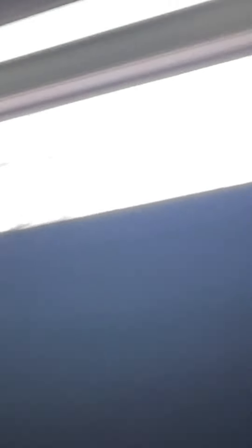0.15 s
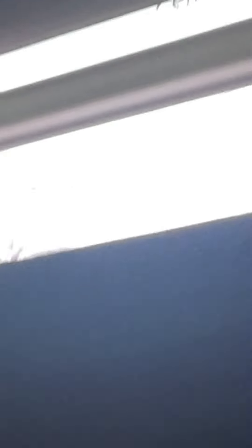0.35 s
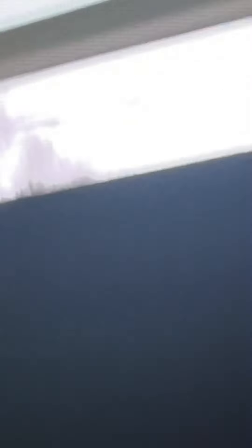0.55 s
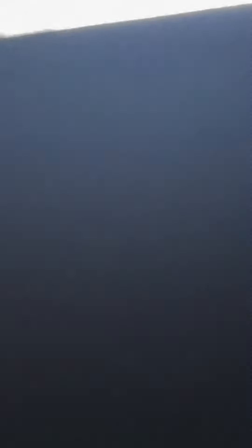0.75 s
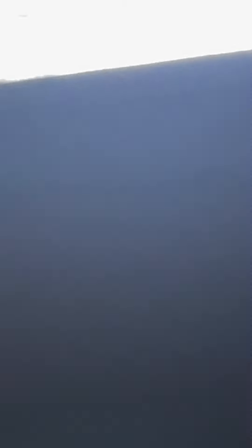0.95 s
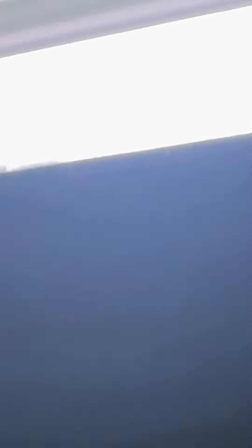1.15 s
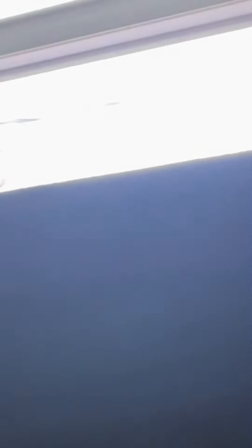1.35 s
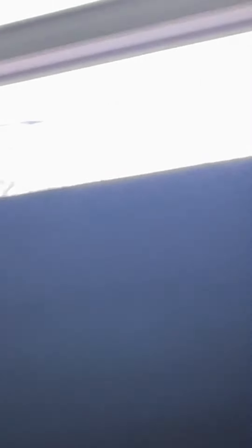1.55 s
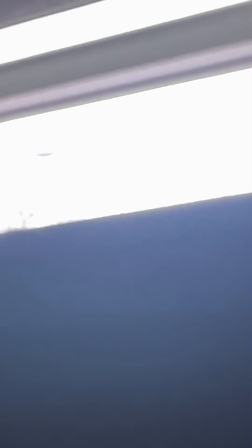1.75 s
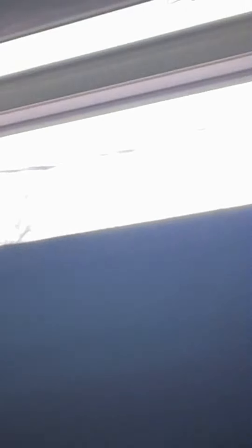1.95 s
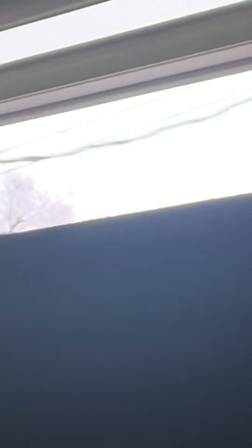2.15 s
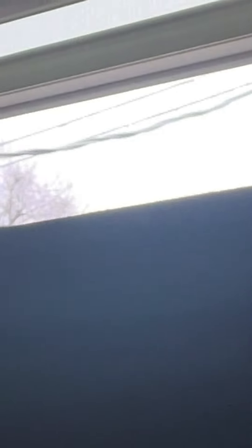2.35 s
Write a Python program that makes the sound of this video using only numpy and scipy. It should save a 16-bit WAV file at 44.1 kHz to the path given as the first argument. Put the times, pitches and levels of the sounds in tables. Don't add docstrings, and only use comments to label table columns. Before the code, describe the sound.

A phone's plastic case scuffs and creaks, then snaps loudly right at the start; a weaker snap, a cluster of ticks and a later knock follow, with low handling rumble, very close in a quiet room.

```python
import sys
import numpy as np
from scipy import signal
from scipy.fft import rfft, irfft
from scipy.io import wavfile
from scipy.ndimage import uniform_filter1d

SR = 44100
rng = np.random.default_rng(int(sys.argv[2]) if len(sys.argv) > 2 else 0)


def level_to_linear(level):
    exponent = np.asarray(level, float) / 20
    return 10 ** exponent


def store_wav(level_fs):
    pcm = np.round(np.clip(np.atleast_2d(level_fs), -1, 1) * 32767)
    wavfile.write(sys.argv[1], SR, pcm.T.astype(np.int16))


N = 105840


def evened(x):
    return x / np.sqrt(np.mean(x ** 2) + 1e-20)


def add(mix, start_s, sound):
    part = mix[round(start_s * SR):][:len(sound)]
    part += sound[:len(part)]


def coloured(x, points):
    hz, db = np.transpose(points)
    bins_hz = np.fft.rfftfreq(N, 1 / SR)
    gain = level_to_linear(np.interp(np.log(bins_hz + 1), np.log(hz + 1), db, -80, -80))
    return evened(irfft(rfft(x) * gain, N))


def resonate(x, hz, width):
    r = np.exp(-np.pi * width / SR)
    return evened(signal.lfilter([1, 0, -r], [1, -2 * r * np.cos(2 * np.pi * hz / SR), r * r], x))


def mode(x, hz, width):
    return resonate(resonate(x, hz, width), hz, width)


def wander(width_s):
    size = int(width_s * SR)
    return evened(uniform_filter1d(uniform_filter1d(rng.standard_normal(N), size), size))


def swell(peak_s, rise_s, fall_s):
    t = np.arange(N) / SR - peak_s
    return np.exp(-(t / np.where(t < 0, rise_s, fall_s)) ** 2)


def ring(hz, t60):
    t = np.arange(800) / SR
    return np.minimum(t * hz, 1) * level_to_linear(-60 * t / t60) * np.sin(2 * np.pi * hz * t)


def room():
    # pitch_hz, level_db
    hiss_spectrum = [(240, -29), (400, -9), (1080, -11.5), (1640, -1), (2580, -20), (3410, -18.5),
                     (3680, -24), (14300, -39), (14900, -53)]
    # pitch_hz, width_hz, level_db
    room_modes = [(960.4, 72, -81), (1550, 900, -77), (1678, 336, -68.5), (2086, 400, -75),
                  (3284, 37, -85.5), (3480, 29, -87)]
    hums = np.zeros(N)
    for hz, width, db in room_modes:
        hums += level_to_linear(db + 0.42 * wander(0.037)) * mode(rng.standard_normal(N), hz, width)
    hiss_db = -68 + 0.48 * wander(0.0076)
    return level_to_linear(hiss_db) * coloured(rng.standard_normal(N), hiss_spectrum) + hums


def grip():
    # time_s, level_db
    grip_levels = [(0.0, -71.5), (0.14, -64.5), (0.37, -61), (0.49, -61.5), (0.61, -66), (0.77, -62),
                   (1.0, -68), (1.26, -59.5), (1.4, -58.5), (1.56, -60.5), (1.84, -65), (1.97, -69),
                   (2.02, -60), (2.2, -57), (2.3, -59.5), (2.4, -60.5)]
    # pitch_hz, level_db
    rumble_spectrum = [(25, -57), (45, -8), (65, 0.5), (108, -6.5), (160, -2), (250, -9), (360, -19),
                       (700, -32)]
    lumpy_db = 2.5
    s, db = np.transpose(grip_levels)
    level_db = np.interp(np.arange(N) / SR, s, db) + lumpy_db * wander(0.09)
    return level_to_linear(level_db) * coloured(rng.standard_normal(N), rumble_spectrum)


def scuffs():
    # peak_s, rise_s, fall_s, body_db, grind_db
    strokes = [(0.045, 0.02, 0.022, -62, -75), (.112, 0.0066, 0.011, -57, -72),
               (0.135, 0.019, 0.027, -55.5, -62.5), (0.206, 0.027, 0.0024, -60, -59),
               (0.249, 0.042, 0.016, -68.5, -62), (0.352, 0.0026, 0.013, -54.5, -62.5),
               (.482, 0.001, 0.0056, -48.5, -69), (0.507, 0.0035, 0.0071, -64, -57),
               (0.493, 0.027, 0.031, -45, -55.5), (0.568, 0.058, 0.081, -58.5, -63),
               (1.125, 0.022, 0.0038, -59, -55.5), (1.135, 0.0039, 0.006, -49, -43),
               (1.163, 0.0099, 0.0075, -54.5, -52.5), (1.197, 0.029, 0.035, -60.5, -65),
               (1.48, 0.0088, 0.065, -69, -60.5), (1.738, 0.089, 0.037, -67.5, -64),
               (1.61, 0.031, 0.021, -56, -64.5), (1.655, 0.016, 0.017, -54.5, -67),
               (2.13, 0.034, 0.085, -69, -73.5), (2.36, 0.13, 0.077, -77, -70)]
    # pitch_hz, width_hz, level_db
    body_modes = [(821, 243, 5.5), (933, 250, 4), (1550, 357, 9), (2430, 290, -1)]
    grit_per_s, grit_db, smooth = 3700, 4, 1
    grind_hz, grind_width = 243, 317
    size = level_to_linear(grit_db * np.minimum(rng.exponential(1, N), 5))
    struck = rng.random(N) < grit_per_s / SR
    grit = size * struck * rng.choice([-1, 1], N)
    drive = evened(grit) + smooth * rng.standard_normal(N)
    body = evened(sum(level_to_linear(db) * mode(drive, hz, width) for hz, width, db in body_modes))
    grind = mode(drive, grind_hz, grind_width)
    out = np.zeros(N)
    for peak, rise, fall, body_db, grind_db in strokes:
        out += swell(peak, rise, fall) * (level_to_linear(body_db) * body + level_to_linear(grind_db) * grind)
    return out


def sways():
    # centre_s, half_length_s, level_db, pitch_hz
    swings = [(0.068, 0.0081, -64, 62.5), (0.487, 0.024, -61.5, 72), (0.581, 0.031, -56.5, 61),
              (0.724, 0.04, -56.5, 60.4), (0.85, 0.037, -62, 64), (1.079, 0.031, -55, 72.6),
              (1.216, 0.018, -63, 58.5), (1.651, 0.037, -57, 65), (1.742, 0.039, -56.5, 65.6),
              (1.877, 0.022, -56.5, 68.2), (2.006, 0.025, -60.5, 73.5), (2.089, 0.046, -51, 61.5),
              (2.164, 0.026, -49, 65), (2.285, .016, -60, 74), (2.296, 0.01, -51, 172),
              (2.37, 0.015, -54.5, 181), (1.547, 0.023, -54.5, 161), (2.36, 0.035, -58.5, 70.5)]
    t = np.arange(N) / SR
    out = np.zeros(N)
    for s, half, db, hz in swings:
        out += level_to_linear(db) * swell(s, half, half) * np.sin(2 * np.pi * hz * (t - s))
    return out


def ticks():
    # start_s, peak_db, pitch_hz
    releases = [(.1168, -49, 3420), (.158, -44, 4000), (0.475, -30, 1410), (.451, -46, 1900),
                (0.4805, -28, 1500), (0.4886, -36, 1310), (0.5045, -28, 1170), (0.516, -29, 1490),
                (0.227, -50, 9000), (0.464, -40, 1550), (0.5684, -34, 1120), (.792, -59, 4940),
                (1.272, -54, 9400), (1.4607, -47, 2550), (1.471, -42, 806), (1.1235, -33, 880),
                (1.1262, -30, 1550), (1.128, -33.5, 686), (1.1325, -33, 1520), (1.784, -47, 3040),
                (2.126, -46, 2530)]
    tick_db, tick_t60, edge_db = -1.5, 0.0025, -5
    out, t = np.zeros(N), np.arange(800) / SR
    edges = rng.standard_normal((len(releases), 800))
    for (s, db, hz), edge in zip(releases, edges):
        fade = level_to_linear(edge_db + 0.42 * (db + 29.5) - 60 * t / tick_t60)
        bright = fade * edge * min(hz / 3500, 1) ** 4
        add(out, s, level_to_linear(db + tick_db) * (ring(hz, tick_t60 * 4000 / hz) + bright))
    return out


def creak():
    # start_s, peak_db
    slips = [(.1703, -43), (.174, -56), (.1759, -51), (.178, -50), (.1802, -54), (.1833, -43), (.1859, -48),
             (.1874, -53), (.1895, -45), (.1918, -53), (.1938, -48), (.197, -48), (.2, -39), (.2031, -39),
             (.2046, -41), (.2055, -38), (.2067, -40), (.2105, -50)]
    slip_hz, slip_t60, edge_db = 4200, .0025, -7
    out, t = np.zeros(N), np.arange(800) / SR
    edges = rng.standard_normal((len(slips), 800))
    for (s, db), edge in zip(slips, edges):
        hz = slip_hz * (1 + 0.14 * edge[-1])
        click = level_to_linear(edge_db - 60 * t / slip_t60) * edge
        add(out, s, level_to_linear(db) * (ring(hz, slip_t60) + click))
    return out


def fizzes():
    # peak_s, rise_s, fall_s, rustle_db, top_db
    slides = [(0.206, 0.006, 0.0011, -48, -52), (.19, 0.019, 0.0085, -63.5, -81),
              (0.247, 0.013, 0.053, -74, -77.5), (0.337, 0.019, 0.012, -88, -78),
              (0.359, 0.019, 0.048, -71.5, -96), (0.494, 0.019, .03, -67, -69.5),
              (.58, 0.078, 0.047, -81.5, -84), (0.991, 0.036, 0.058, -74.5, -75),
              (1.133, 0.0087, 0.0066, -68.5, -71), (1.15, 0.005, 0.005, -64.5, -66),
              (1.167, 0.0026, 0.0067, -71.5, -69), (1.189, 0.061, 0.058, -74.5, -80.5),
              (1.44, 0.11, 0.047, -78.5, -107), (1.609, 0.014, 0.016, -67, -93),
              (1.645, .02, 0.019, -76.5, -94), (1.64, 0.13, 0.095, -70.5, -95),
              (2.17, 0.079, 0.18, -81.5, -96)]
    # pitch_hz, level_db
    rustle_spectrum = [(2200, -39), (3200, -4.5), (5200, -1.5), (6600, -10.5), (7800, -18), (9200, -13),
                       (11500, -32)]
    top_spectrum = [(5500, -64), (7500, 0.5), (9400, 7), (12000, 12), (14200, 7.5), (15800, -6)]
    drive = rng.standard_normal(N) * level_to_linear(2.5 * wander(0.0014))
    rustle, top = coloured(drive, rustle_spectrum), coloured(drive, top_spectrum)
    out = np.zeros(N)
    for peak, rise, fall, rustle_db, top_db in slides:
        out += swell(peak, rise, fall) * (level_to_linear(rustle_db) * rustle + level_to_linear(top_db) * top)
    return out


def bending_wave():
    start_s, level_db, fall_power = .2071, -24, .85
    turns, peak_s, rise_s = 1.44, .0024, .0017
    t = np.arange(1, 2600) / SR
    u = t / peak_s
    rise = 1 - np.exp(-(t / rise_s) ** 6)
    fall = u ** -fall_power * np.exp(-(t / .026) ** 2)
    out = np.zeros(N)
    add(out, start_s, level_to_linear(level_db) * rise * fall * np.cos(2 * np.pi * turns * np.log(u)))
    return out


def snaps():
    # start_s, crack_db, crack_hz, ring_db, ring_hz
    hard_snaps = [
        (.20833, -17.5, 5200, -19, 840),
        (.35105, -34.5, 3900, -28, 1600),
    ]
    # pitch_ratio, level_db
    crack_partials = [(.6, -8), (1.7, -11), (2.65, -16)]
    crack_cycles, crack_lead = .95, .3
    bright, hard_db = .7, -17.5
    lag_turns, ring_t60 = .22, .009
    overtone, overtone_db = 1.9, -6
    out, t = np.zeros(N), np.arange(1, 2600) / SR
    for s, crack_db, hz, ring_db, ring_hz in hard_snaps:
        softness_db = crack_db - hard_db
        u = (t - t[99]) * hz
        crack = np.cos(2 * np.pi * u)
        for ratio, db in crack_partials:
            crack += level_to_linear(db + bright * softness_db) * np.cos(2 * np.pi * ratio * u)
        burst = np.exp(-abs((u + crack_lead * level_to_linear(softness_db)) / crack_cycles) ** 1.7)
        add(out, s - t[99], level_to_linear(crack_db) * burst * crack)
        turn = 2 * np.pi * ring_hz * t
        decay = level_to_linear(ring_db - 60 * t * (ring_hz / 1000) ** 2 / ring_t60)
        decay *= np.minimum(2 * t * ring_hz, 1)
        upper = level_to_linear(overtone_db + bright * softness_db) * np.cos(overtone * (turn - 3 * np.pi / 2))
        add(out, s + lag_turns / ring_hz, -decay * (np.sin(turn) - upper))
    return out


def rebound():
    out = np.zeros(N)
    add(out, .2095, level_to_linear(-11.5) * ring(1140, .0029))
    return out


def bumps():
    # start_s, level_db, pitch_hz, hold_s, fall_s
    shakes = [(1.1284, -35.5, 138, 0.04, 0.002), (1.1768, -43, 100, 0.018, 0.012),
              (1.477, -47, 105, .016, .004), (1.506, -46.5, 80, .01, .008), (2.206, -48, 110, .011, .002),
              (.67, -49.5, 160, 0.0073, 0.0073), (1.595, -46, 139, 0.009, 0.0034)]
    sag_s = .044
    out, t = np.zeros(N), np.arange(6000) / SR
    for s, db, hz, hold, fall in shakes:
        shape = np.minimum(t / 0.0041, 1) * np.exp(-np.maximum(t - hold, 0) / fall)
        turn = 2 * np.pi * hz * sag_s * np.log(1 + t / sag_s)
        add(out, s, -level_to_linear(db) * shape * np.sin(turn))
    return out


def rub():
    # peak_s, rise_s, fall_s, level_db
    strokes = [
        (1.6, 0.01, .03, -68),
        (1.665, 0.033, 0.036, -60.5),
        (1.72, 0.055, 0.044, -65),
    ]
    hum = mode(rng.standard_normal(N), 890, 570)
    return hum * sum(level_to_linear(db) * swell(peak, rise, fall) for peak, rise, fall, db in strokes)


def scene():
    background = room() + grip()
    friction = scuffs() + fizzes() + rub()
    releases = ticks() + creak() + snaps() + rebound() + bending_wave()
    shaking = sways() + bumps()
    return (background + friction + releases + shaking)[None]


def band_limit(x):
    return signal.sosfilt(signal.butter(12, 16510, fs=SR, output="sos"), x)


def record(dry):
    low_cut = signal.butter(4, 42, "high", fs=SR, output="sos")
    top_cut = signal.firwin(101, 15700, fs=SR)[None]
    mix = signal.oaconvolve(signal.sosfilt(low_cut, dry), top_cut, "same")
    return band_limit(mix)


dry = scene()
out = record(dry)
store_wav(out)
```